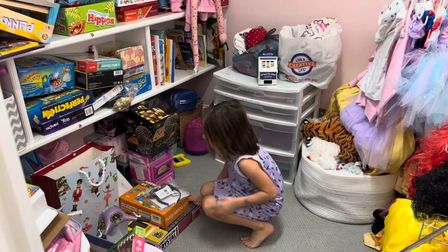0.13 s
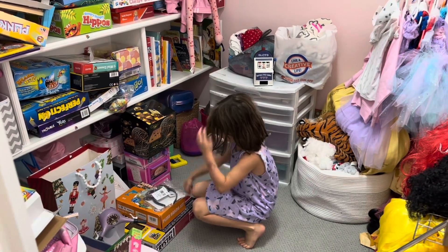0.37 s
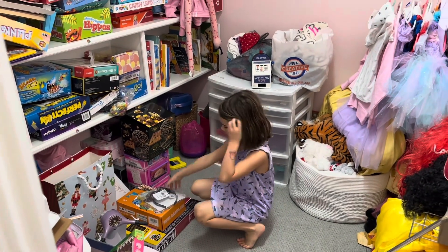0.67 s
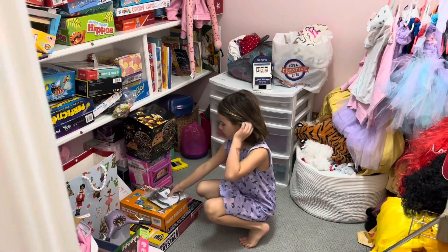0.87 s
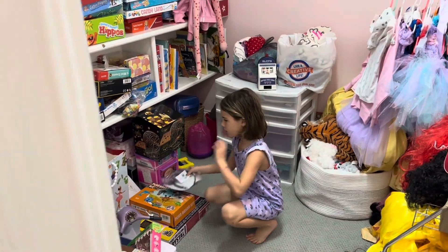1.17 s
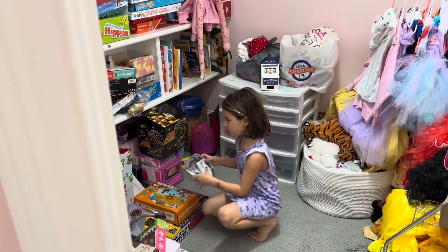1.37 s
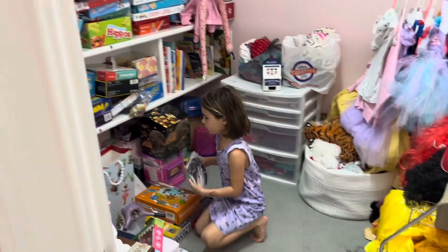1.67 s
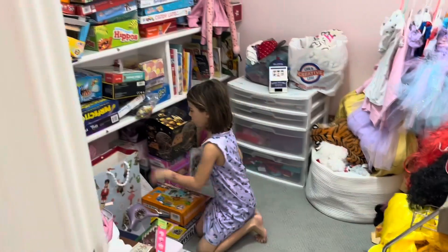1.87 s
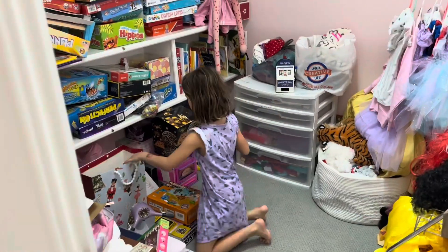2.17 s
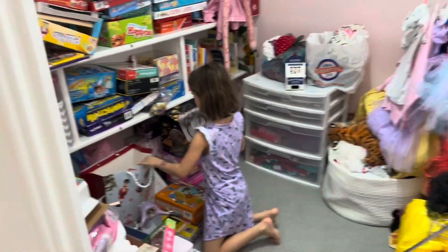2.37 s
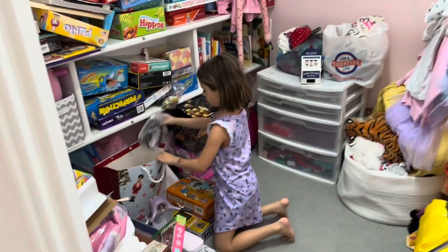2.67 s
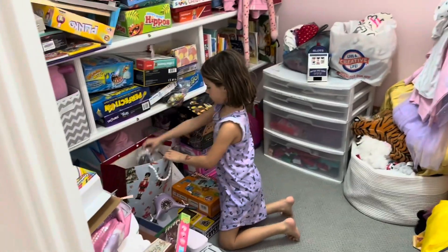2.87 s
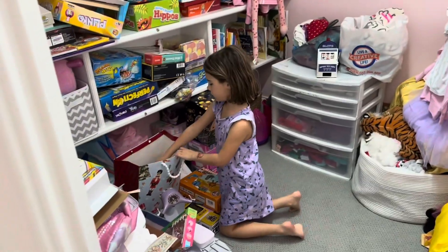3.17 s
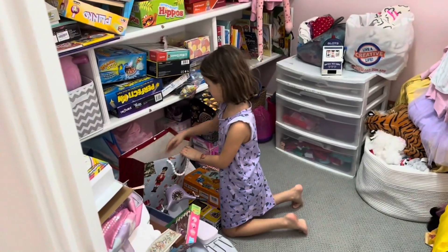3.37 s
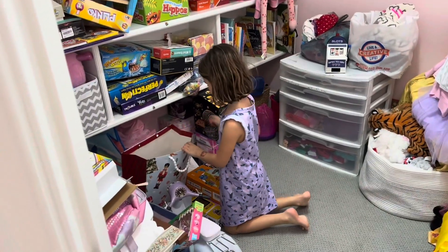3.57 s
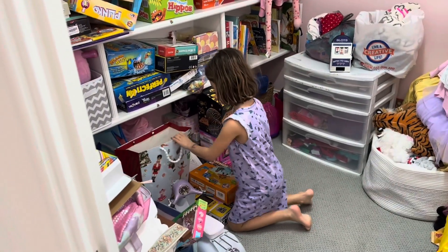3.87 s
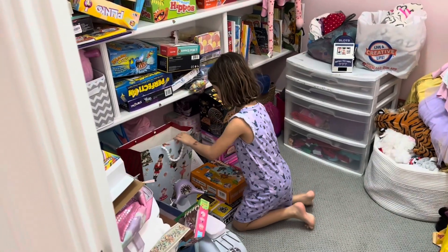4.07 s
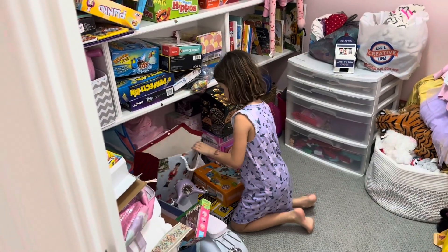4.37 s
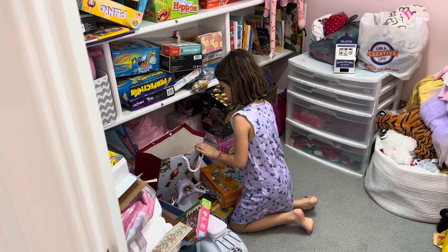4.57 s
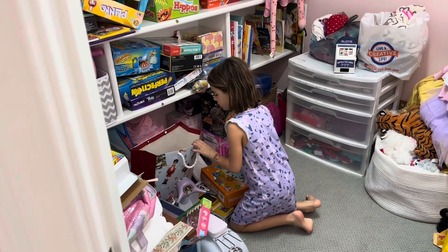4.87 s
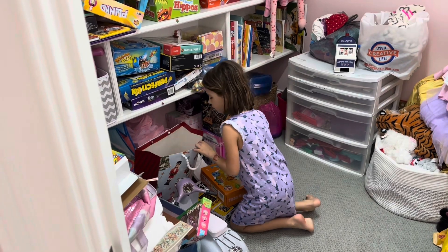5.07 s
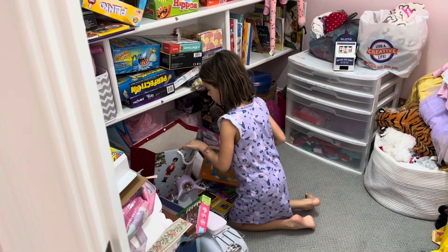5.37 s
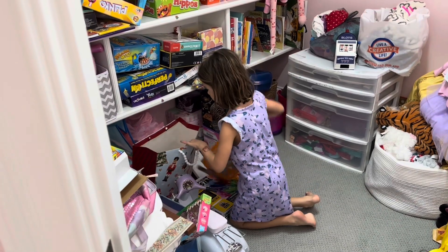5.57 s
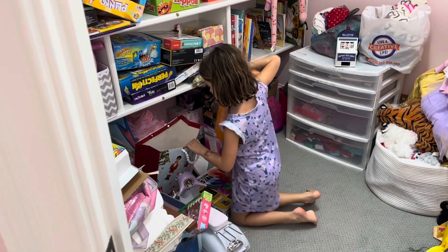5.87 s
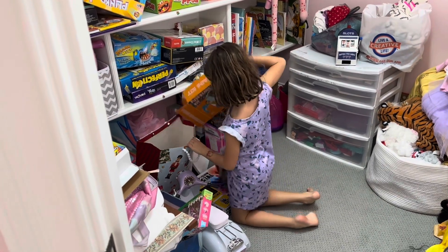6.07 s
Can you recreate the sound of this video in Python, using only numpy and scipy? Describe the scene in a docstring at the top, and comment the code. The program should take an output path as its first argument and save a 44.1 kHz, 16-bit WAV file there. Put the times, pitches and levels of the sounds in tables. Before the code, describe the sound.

A stiff paper bag crinkles softly amid light knocks, then bursts into loud rustling and thumping in a small closet.

```python
"""A stiff paper bag crinkles as small things are handled and dropped into it, in a carpeted closet.
The paper buckles in tiny clicks, coloured by thin wrapping, bag walls and fine creases; folds snap.
Knees and boxes thud on the floor, and something slides along a box. At the end a bulky thing is
dragged out and the bag's walls crash and boom. A faint ring comes and goes over a low house rumble."""
import sys
import numpy as np
from scipy import signal
from scipy.fft import rfft, irfft, next_fast_len
from scipy.io import wavfile

SR = 44100
rng = np.random.default_rng(int(sys.argv[2]) if len(sys.argv) > 2 else 0)


def generate_wav(sig):
    """Save sig (samples, or channels by samples) to the path in sys.argv[1] as 16-bit PCM at SR."""
    pcm = np.round(np.clip(np.atleast_2d(sig).T, -1, 1) * 32767).astype(np.int16)
    wavfile.write(sys.argv[1], SR, pcm)


N = 274743
TIME = np.arange(N) / SR
FFT_SIZE = next_fast_len(N + SR)
BIN_HZ = np.maximum(np.arange(FFT_SIZE // 2 + 1) * SR / FFT_SIZE, 1)

# Spectra of wrapping, walls and fine creases; the top hiss has a narrow gap near 11 kHz that is
# not the paper's. Each row: frequency in Hz, relative density in dB.
WRAPPING_SPECTRUM = [(200, -87), (700, -2), (1500, 4), (2200, 2.5), (3200, 0.5), (4500, -2.5), (6500, -9),
                     (10000, -68)]
WALL_SPECTRUM = [(45, -51), (80, 5), (150, 7), (350, 5), (600, 7.5), (1000, 1.5), (1400, -6), (2000, -10.5),
                 (3500, -86)]
CREASE_SPECTRUM = [(600, -64), (2500, -16.5), (5000, -2.5), (7000, 7.5), (9000, 10.5), (10300, 2.5),
                   (11300, -44), (12600, 3), (14000, -3.5), (15500, 5.5)]
def paper(buckles):
    """Source and filter: the same buckles sound through wrapping, bag walls and finest creases."""
    spectra = (WRAPPING_SPECTRUM, WALL_SPECTRUM, CREASE_SPECTRUM)
    return [rms_one(coloured(buckles, spectrum)) for spectrum in spectra]


# Strokes of the hands. Each row: time of full level in seconds, swell in seconds per 20 dB,
# hold in seconds, wrapping level in dB, wall and crease levels in dB above the wrapping.
HAND_STROKES = [(0.0, .01, 0.011, -65, 3.5, -3), (.08, 0.044, 0.11, -72.5, -3, 0.5),
                (0.258, 0.22, 0.0036, -67.5, 4.5, 3.5), (0.351, 0.037, 0.0077, -71, 5.5, 6.5),
                (0.643, 0.052, 0.046, -53.5, -11.5, 1), (0.809, 0.075, 0.032, -52, -9, -2),
                (0.939, 0.084, 0.18, -51.5, -11, 4), (1.16, 0.18, 0.026, -73, -3, 9),
                (1.299, 0.14, 0.0061, -59, -14, -1), (1.371, 0.02, 0.12, -51, -10, 0.5),
                (1.5, 0.047, 0.05, -58, -1.5, 0), (1.605, 0.012, 0.13, -56, -9, 6),
                (1.838, 0.71, 0.0083, -62, -25, 0), (2.05, 0.095, 0.049, -66.5, -26, -2),
                (2.27, 0.31, 0.056, -69.5, -2.5, -3.5), (2.499, 0.08, 0.011, -60, -7.5, -2),
                (2.8, 0.27, 0.038, -63, -6.5, 3), (2.93, 0.15, 0.14, -67, -6, -9.5),
                (3.088, 0.089, 0.12, -58.5, -4.5, 5), (3.26, 0.036, 0.04, -52, -7.5, 0),
                (3.78, 0.15, 0.11, -70.5, 5.5, -4.5), (4.02, 0.088, 0.32, -72.5, 9.5, -6),
                (4.313, 0.057, 0.18, -63, -0.5, -5.5), (4.479, 0.14, 0.025, -57, 2.5, -3),
                (4.6, 0.12, 0.026, -68.5, 6, -2.5), (4.89, 0.78, 0.11, -81, 15, -12),
                (5.098, 0.34, .2, -77, 15.5, 0), (5.299, 0.12, 0.064, -58.5, 0.5, -1.5),
                (5.463, 0.1, 0.12, -46, -7.5, 3), (5.63, 0.086, 0.058, -56, -26, 7.5),
                (5.69, 0.036, 0.051, -44.5, -3, 1.5), (5.732, 0.011, 0.008, -39.5, 4.5, -2),
                (5.755, 0.018, 0.007, -28.5, -6.5, -7), (5.837, 0.082, 0.013, -35.5, 2, 1),
                (5.885, 0.048, .02, -48, 4, 4), (5.923, 0.021, 0.019, -33, -5, 3.5),
                (5.956, 0.044, 0.026, -30.5, 0.5, -10), (5.998, 0.09, 0.015, -26.5, 3, 0),
                (6.104, 0.063, 0.019, -31.5, 3.5, 2.5), (6.185, 0.1, .06, -44.5, 12, 4.5)]
# Decay after a stroke in dB per second, for wrapping, walls and creases.
PAPER_DECAY_DB_PER_S = [194, 161, 256]
# Level of the paper settling between strokes in dB, for the same three parts.
SETTLING_DB = [-87.5, -81.5, -90]
def stroke_gains(sag_db_per_s=25):
    """Incoherent sounds add in power: in each part, strokes swell, sag while held and die away."""
    power = np.outer(from_db(SETTLING_DB) ** 2, np.ones(N))
    for full_s, swell_s, hold_s, level_db, wall_db, crease_db in HAND_STROKES:
        near = slice(max(round((full_s - 3 * swell_s) * SR), 0), round((full_s + hold_s + .5) * SR))
        t = TIME[near] - full_s
        shape_db = 20 * np.minimum(t, 0) / swell_s - sag_db_per_s * np.clip(t, 0, hold_s)
        release_db = np.outer(PAPER_DECAY_DB_PER_S, np.maximum(t - hold_s, 0))
        parts_db = level_db + np.array([[0], [wall_db], [crease_db]])
        power[:, near] += from_db(parts_db + shape_db - release_db) ** 2
    return np.sqrt(power)


def crinkle(flicker_db=1.66, flicker_hz=8.9):
    """Buckling under the hands: each part of the paper wavers on its own, so the colour shifts."""
    parts = paper(clicks(9000, spread_db=2.2, clump_db=0.8))
    return sum(gain * from_db(flicker_db * drift(flicker_hz)) * part
               for gain, part in zip(stroke_gains(), parts))


# Folds giving way. Each row: start in seconds, approximate peak of the wrapping in dB,
# wall and crease levels in dB above the wrapping.
FOLD_SNAPS = [(0.222, -47.5, 9.5, 1), (0.246, -45.5, 9, 7), (0.332, -44, 1, 3.5), (0.614, -39.5, -29, -10),
              (0.778, -42.5, -3, -12), (0.8405, -38.5, -19, 8), (0.93, -36.5, -12, 13),
              (1.084, -37.5, -17, -3), (1.2007, -45.5, -11, 6), (1.358, -33, -26, -20),
              (1.369, -31, -13, -18), (1.394, -35, -19, -5), (1.44, -28.5, -30, -8),
              (1.574, -35.5, -26, 7.5), (1.737, -34.5, -11, 1), (1.824, -45, -20, 5),
              (2.022, -54.5, -12, 11), (2.128, -51.5, -7, 0), (2.203, -51, -13, 9), (2.3086, -46.5, -23, 4),
              (2.4832, -35, -17, 5), (2.627, -47, -19, 7.5), (2.679, -47.5, -22, 7.5),
              (2.743, -46, -16, -8), (2.786, -40, -14, 5), (3.015, -45.5, 5.5, -24), (3.12, -54, -9, 3),
              (3.252, -30, -18, -14), (3.371, -48, -14, 4), (3.849, -56, -7, 13.5), (3.99, -45.5, -5, -23),
              (4.0742, -45.5, -20, 3), (4.158, -44.5, -18, -9), (4.256, -53, 3, -6), (4.453, -47.5, 14, -9),
              (4.8667, -48.5, -9.5, -6.5), (5.745, -10, -16, -2.5), (5.758, -19.5, -1, 10.5),
              (5.838, -16, -2, -8), (5.91, -20, 1, -9), (5.9914, -14, -10, 3), (6.018, -22, -9, 8),
              (6.112, -17.5, -13, 7), (6.13, -21.5, 15.5, -6)]
def snaps(t60_s=0.068, rise_s=0.0034, crest_db=13.5):
    """Snap-through: a fold gives way with one click, and a spray of smaller buckles dies after it."""
    spray = clicks(9000, spread_db=0.5, clump_db=0.2)
    spray[[round(row[0] * SR) + 20 for row in FOLD_SNAPS]] = from_db(15.5)   # the leading clicks
    wrapping, wall, creases = paper(spray)
    out, t = np.zeros(N), TIME[:SR // 2]
    for start_s, peak_db, wall_db, crease_db in FOLD_SNAPS:
        start = round(start_s * SR)
        span = slice(start, min(start + len(t), N))
        envelope = from_db(peak_db - 60 * t / t60_s) * np.minimum(t / rise_s, 1)
        sheet = wrapping[span] + from_db(wall_db) * wall[span] + from_db(crease_db) * creases[span]
        out[span] += envelope[:span.stop - start] * sheet
    return from_db(-crest_db) * out   # the spray's mean level lies below its peaks


def flexing(x, lowest_hz=400, bands=11, depth_db=2, rate_hz=13.1):
    """Amplitude modulation: each half octave swells and sinks on its own as creases open and close."""
    half_octaves = np.clip(2 * np.log2(BIN_HZ / lowest_hz), 0, bands - 1)
    spectrum, out = rfft(x, FFT_SIZE), 0
    for band in range(bands):
        share = np.clip(1 - np.abs(half_octaves - band), 0, 1)
        out = out + from_db(depth_db * drift(rate_hz)) * irfft(spectrum * share, FFT_SIZE)[:N]
    return out


# Knocks on boxes and floor. Each row: start in seconds, level in dB, centre of the excited band
# in Hz, its spread in octaves.
KNOCKS = [(0.194, -47.5, 494, 1.4), (.236, -39.5, 180, 0.38), (0.248, -40.5, 300, 1.1),
          (.26, -40, 199, 0.64), (.279, -42, 200, 0.41), (0.341, -41, 295, 1.9), (1.478, -33, 885, 1.5),
          (1.498, -43, 90.5, 0.49), (1.56, -29, 39.8, 0.43), (1.754, -32, 270, 0.79), (1.78, -41, 400, 1.2),
          (2.149, -49.5, 144, 0.47), (2.245, -49.5, 724, 0.8), (2.245, -32.5, 124, 0.42),
          (2.281, -40.5, 199, 0.88), (2.643, -49.5, 204, 1.9), (3.014, -53, 507, 0.99),
          (3.739, -43.5, 450, 1.2), (3.754, -39.5, 196, 0.59), (3.777, -34, 830, 0.64),
          (3.785, -33, 148, 1.34), (4.022, -43.5, 990, 1.5), (4.077, -40, 785, 0.96),
          (4.257, -44.5, 600, 1.2), (4.383, -44.5, 182, 0.32), (4.465, -39.5, 220, 0.89),
          (4.489, -38, 194, 0.83), (4.511, -41, 200, .5), (5.083, -46.5, 710, 0.88), (5.506, -37, 90, 0.98),
          (5.55, -33, 115, 1.8), (5.682, -33, 790, 0.24), (5.695, -39, 760, 0.4),
          (5.749, -14.5, 1340, 0.35), (5.856, -25.5, 304, 0.41), (5.91, -14.5, 890, 0.35),
          (5.922, -22, 790, 0.47), (5.958, -17.5, 1220, 0.3), (5.99, -11, 500, 1.6), (5.996, -21, 86, 0.48),
          (6.013, -7.5, 750, 1.3), (6.023, -14.5, 616, 1.34), (6.115, -12.5, 430, 0.17),
          (6.131, -23, 300, 1.5), (6.16, -18.5, 585, 1), (6.171, -17, 706, 0.81)]
# Modes of boxes and floor. Each row: frequency in Hz, relative level in dB, 60 dB decay time in seconds.
BOX_MODES = [(36, -15, 0.29), (75.5, -1.5, 0.13), (85, 0.5, 0.25), (124.5, 0, 0.24), (150, 1, 0.11),
             (203.5, 3.5, 0.15), (216, -4.5, 0.1), (261, -1, 0.06), (338, 0.5, 0.12), (441.7, -4.5, 0.095),
             (541, -6, 0.05), (618, 0.5, 0.084), (785, -5.5, 0.12), (858, -4, 0.055), (1017, -7, 0.076),
             (1236, 2.5, 0.027), (1300, -22, 0.19), (1400, -12, 0.014), (1580, -11.5, 0.035),
             (2020, -5, 0.049), (2300, -22, .03)]
def thuds(detune=.035, scatter_db=2.5):
    """Modal vibration: a knock excites damped modes near its centre, with random strength and sign."""
    out, t = np.zeros(N + SR), TIME[:SR // 2]
    resting_hz, mode_db, t60_s = np.array(BOX_MODES).T[:, :, None]
    scatter = rng.normal(0, 1, (len(KNOCKS), 3, len(BOX_MODES), 1))
    for (start_s, level_db, centre_hz, octaves), (strength, sign, shift) in zip(KNOCKS, scatter):
        hz = resting_hz * np.exp(detune * shift)   # a hand or knee on the box shifts each mode
        reach = np.exp(-.5 * (np.log2(hz / centre_hz) / octaves) ** 2)
        decay = from_db(mode_db + scatter_db * strength - 60 * t / t60_s)
        attack = 1 - np.exp(-3.0 * hz * t)   # the push takes part of a cycle to build
        modes = unit_energy(reach) * np.sign(sign) * attack * decay * np.sin(2 * np.pi * hz * t)
        start = round(start_s * SR)
        out[start:start + len(t)] += from_db(level_db) * modes.sum(axis=0)
    return out[:N]


def floor_tail(x, t60_s=0.2, rise_s=0.022, tail_db=-10):
    """Diffuse decay: knocks linger in the floor and stacked boxes as a tail that builds and dies."""
    t = TIME[:SR // 2]
    tail = rng.standard_normal(len(t)) * from_db(-60 * t / t60_s) * np.minimum(t / rise_s, 1)
    return x + from_db(tail_db) * signal.fftconvolve(x, unit_energy(tail))[:N]


# Colour of cloth rubbing the bag wall. Each row: frequency in Hz, relative density in dB.
CLOTH_SPECTRUM = [(700, -40), (1600, -12.5), (2300, 0.5), (3200, -1), (4400, -8), (6000, -11.5),
                  (9000, -50)]
# Course of the pull. Each row: time in seconds, level in dB.
PULL_LEVELS = [(5.25, -72), (5.36, -59), (5.42, -49), (5.47, -43), (5.55, -44), (5.6, -49.5), (5.66, -51.5),
               (5.75, -90)]
def drag():
    """Sliding friction: dense, nearly even slips of cloth on paper merge into a smooth swish."""
    pull = envelope_of([(0, -120)] + PULL_LEVELS + [(7, -120)])
    slips = clicks(12000, spread_db=-0.5, clump_db=-0.44)
    return pull * rms_one(coloured(slips, CLOTH_SPECTRUM))


# Resonances of a hollow box. Each row: frequency in Hz, bandwidth in Hz, relative peak gain in dB.
BOX_RESONANCES = [(520, 24, -5), (1037, 42, -10), (1140, 36, -4)]
def slide(peak_s=4.33, peak_db=-47, rise_db_per_s=450, fall_db_per_s=192):
    """Forced resonance: friction noise from something sliding along a box makes it hum."""
    friction, hum, t = rng.standard_normal(N), 0, TIME - peak_s
    for hz, width_hz, gain_db in BOX_RESONANCES:
        poles = resonator(hz, width_hz)
        mode = hz * signal.lfilter([1 - poles[2]], poles, friction)   # scaled to equal peak gains
        hum = hum + from_db(gain_db) * mode
    return from_db(peak_db + np.minimum(rise_db_per_s * t, -fall_db_per_s * t)) * rms_one(hum)


# Colour of movement on the carpet and among the boxes. Each row: frequency in Hz, relative density in dB.
CARPET_SPECTRUM = [(30, -25), (48, -11), (62, 4), (80, 0), (130, 1), (200, 2), (320, -6.5), (700, -77)]
# Course of the shifting weight. Each row: time in seconds, level in dB.
WEIGHT_LEVELS = [(0.0, -62.5), (0.21, -67), (0.68, -70.5), (2.38, -70), (2.53, -67), (3.19, -58.5),
                 (3.56, -69), (4.49, -60), (4.77, -65.5), (5.43, -55.5), (5.83, -55), (5.92, -37),
                 (6.02, -32), (6.23, -41)]
def shuffle():
    """Shot noise: sparser, duller clicks follow the weight shifting on the carpet."""
    contacts = clicks(1500, spread_db=3.5, clump_db=1.0)
    return envelope_of(WEIGHT_LEVELS) * rms_one(coloured(contacts, CARPET_SPECTRUM))


# Swells of a faint ring. Each row: centre and spread in seconds, frequency in Hz, level in dB.
RING_SWELLS = [(.03, 0.06, 1900, -64), (2.6, 0.017, 1950, -73), (2.92, 0.12, 2120, -72),
               (3.65, 0.011, 1860, -73.5), (3.96, 0.045, 2110, -70.5), (4.18, 0.071, 2080, -76),
               (4.8, 0.081, 1970, -73), (4.96, 0.059, 2000, -71.5)]
def rings(width_hz=130):
    """Narrow-band noise: each swell passes through one resonance and is heard as a soft pitch."""
    noise, out = rng.standard_normal(N), 0
    for centre_s, spread_s, hz, level_db in RING_SWELLS:
        tone = rms_one(signal.lfilter([1, 0, -1], resonator(hz, width_hz), noise))
        swell = np.exp(-.5 * ((TIME - centre_s) / spread_s) ** 2)
        out = out + from_db(level_db) * swell * tone
    return out


# Stereo width of closet and house, narrow in the bass. Each row: frequency in Hz, side gain in dB.
SIDE_SPECTRUM = [(60, -20), (110, -14.5), (200, -9.5), (380, -0.5), (700, 0.5), (1290, 5), (2380, -0.5),
                 (4400, 0), (8120, -3.5), (11500, 13), (15000, -10)]
def closet(x, t60_s=0.074, tail_db=-9, move_s=.18):
    """Reverberation: shelves and walls add a short, dense tail that changes as the hands move."""
    t, hop = TIME[:SR // 3], round(move_s * SR)
    decay = from_db(tail_db) * unit_energy(from_db(-60 * t / t60_s) * (t > .002))
    spots = N // hop + 2
    tails = rng.standard_normal((2, spots, len(t)))   # mid and side for each place of the hands
    # The tail carries little bass, so low knocks stay dry and even.
    tails[0] = signal.sosfilt(signal.butter(1, 300, "high", fs=SR, output="sos"), tails[0])
    tails[1] = from_db(5.5) * coloured(tails[1], SIDE_SPECTRUM)
    padded, wet = np.pad(x, (hop, 2 * hop)), np.zeros((2, N + 3 * hop + len(t)))
    for k in range(spots - 1):
        piece = padded[k * hop:(k + 2) * hop] * np.sqrt(np.hanning(2 * hop))
        heard = signal.fftconvolve(piece[None], tails[:, k] * decay, axes=1)
        wet[:, k * hop:k * hop + heard.shape[1]] += heard
    mid, side = wet[:, hop:hop + N]
    lag = np.pad(x, (1, 0))[:N] - x   # below 10 kHz the direct sound is one sample later on the right
    late = x + signal.sosfiltfilt(signal.butter(2, 10000, fs=SR, output="sos"), lag)
    return np.array([x + mid + side, late + mid - side])


# Background of the house. Each row: frequency in Hz, relative density in dB.
RUMBLE_SPECTRUM = [(15, -18), (25, 0.5), (59, 19.5), (99, 11), (133, 12.5), (188, -43), (332, -0.5),
                   (404, -13), (543, -8.5), (1450, -40), (1950, -19), (2500, -23.5), (9000, -49),
                   (11700, -56), (19800, -120)]
def house(level_db=-62.5, waver_db=2.2, waver_hz=2.9):
    """Ambient noise: distant rumble and hiss, wavering slowly in level."""
    mid, side = coloured(rng.standard_normal((2, N)), RUMBLE_SPECTRUM)
    gain = from_db(level_db + waver_db * drift(waver_hz)) / np.std(mid)
    side = coloured(side, SIDE_SPECTRUM)
    return gain * np.array([mid + side, mid - side])


def clicks(per_s, spread_db, clump_db):
    """A Poisson process: random impulses of uneven size, louder and softer in clumps."""
    sizes = from_db(spread_db * np.minimum(rng.exponential(1, N), 4)) * rng.choice([-1, 1], N)
    clumps = from_db(clump_db * (drift(40.0) + 1.8 * drift(85)))
    return sizes * clumps * (rng.random(N) < per_s / SR)


def drift(corner_hz):
    """Low-passed noise: a random wander of rms 1."""
    r = np.exp(-2 * np.pi * corner_hz / SR)
    return rms_one(signal.lfilter([1], [1, -2 * r, r * r], rng.standard_normal(N + SR))[SR:])


def resonator(hz, width_hz):
    """A damped oscillator, as the denominator of a two-pole filter."""
    r = np.exp(-np.pi * width_hz / SR)
    return [1, -2 * r * np.cos(2 * np.pi * hz / SR), r * r]


def coloured(x, spectrum):
    """Zero-phase filtering by (Hz, dB) points joined on a log frequency axis."""
    hz, level_db = np.transpose(spectrum)
    gain = from_db(np.interp(np.log(BIN_HZ), np.log(hz), level_db))
    return irfft(rfft(x, FFT_SIZE) * gain, FFT_SIZE)[..., :x.shape[-1]]


def envelope_of(points):
    """Gain over time, interpolated between (seconds, dB) points."""
    return from_db(np.interp(TIME, *np.transpose(points)))


def from_db(db):
    """Decibels to amplitude ratio."""
    return 10 ** (np.asarray(db) / 20)


def rms_one(x):
    """Normalisation to rms 1."""
    return x / np.sqrt(np.mean(x ** 2) + 1e-20)


def unit_energy(x):
    """Normalisation to a sum of squares of 1."""
    return x / np.sqrt(np.sum(x ** 2))


def scene():
    """Superposition: everything handled sounds in the closet, over the rumble of the house."""
    crinkling, shuffling = crinkle(), shuffle()
    bag = flexing(crinkling) + flexing(snaps())
    return closet(bag + shuffling + floor_tail(thuds()) + slide() + drag() + rings()) + house()


def record(dry, ceiling=.9, cutoff_hz=15800):
    """Soft saturation rounds the loudest peaks, and a steep low-pass cuts the top."""
    rounded = ceiling * np.tanh(dry / ceiling)
    return signal.sosfilt(signal.ellip(12, .5, 80, cutoff_hz, fs=SR, output="sos"), rounded)


dry = scene()
out = record(dry)
generate_wav(out)
```